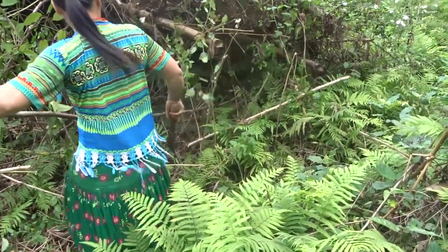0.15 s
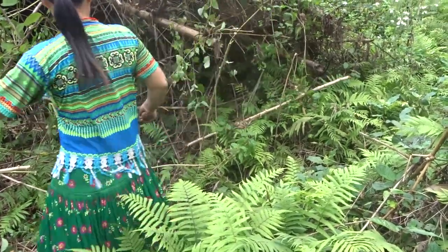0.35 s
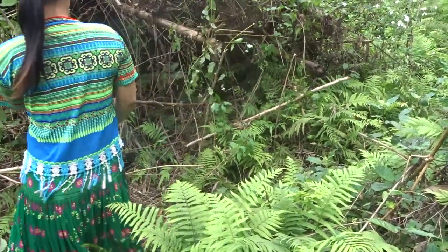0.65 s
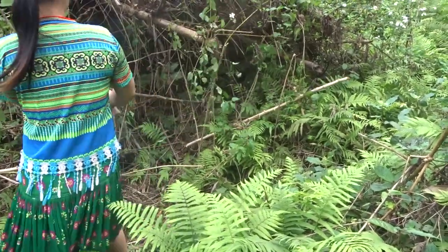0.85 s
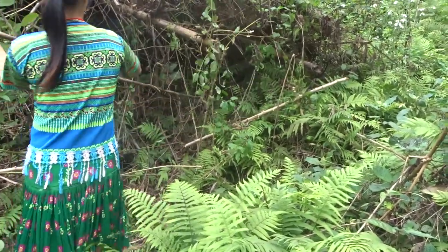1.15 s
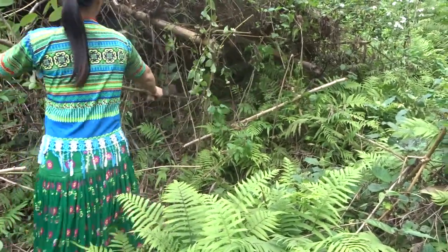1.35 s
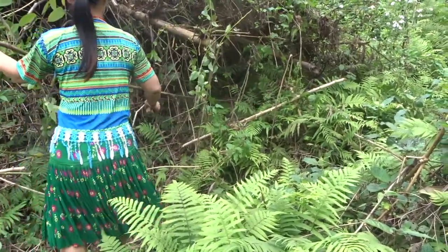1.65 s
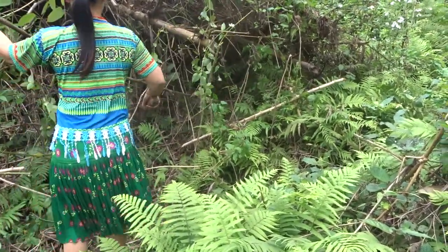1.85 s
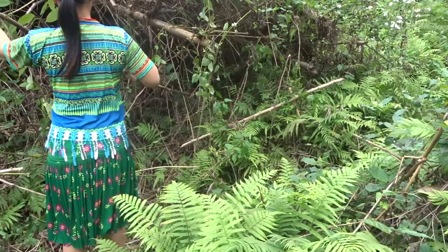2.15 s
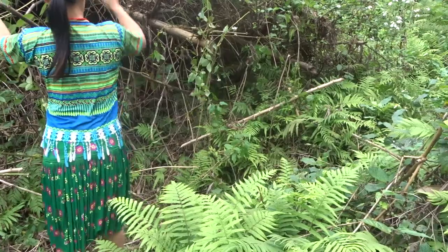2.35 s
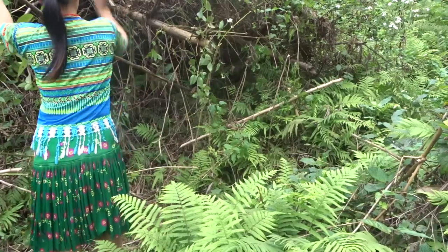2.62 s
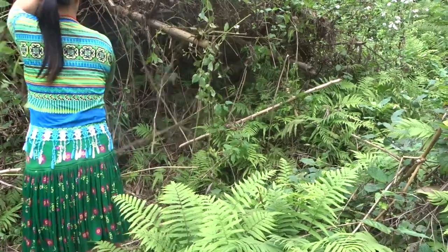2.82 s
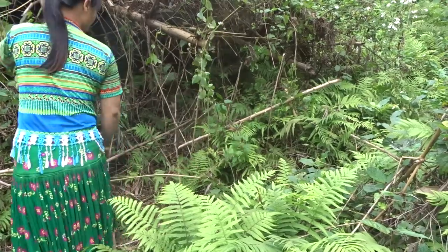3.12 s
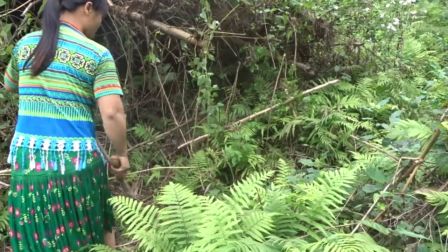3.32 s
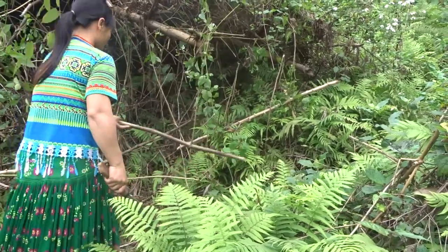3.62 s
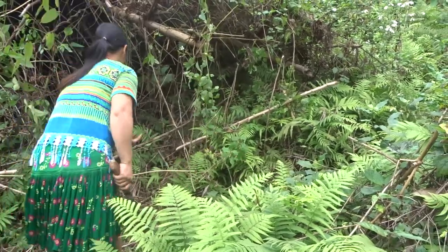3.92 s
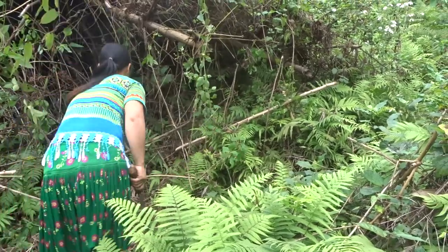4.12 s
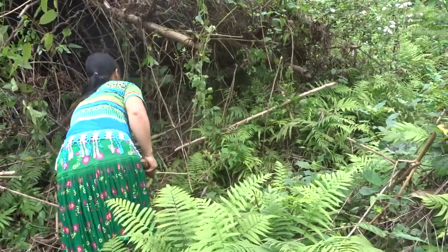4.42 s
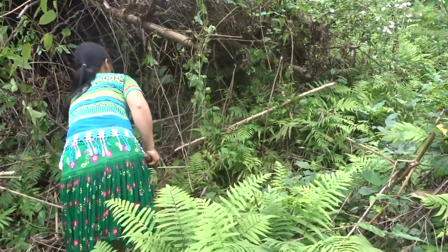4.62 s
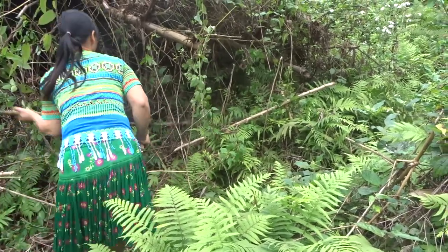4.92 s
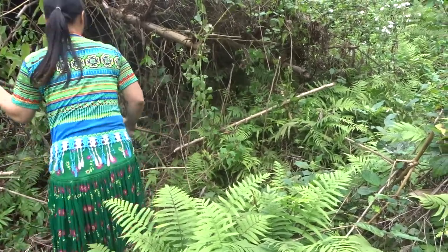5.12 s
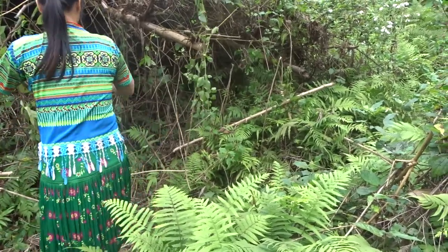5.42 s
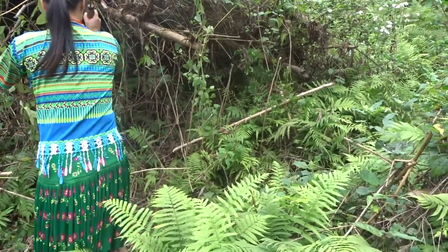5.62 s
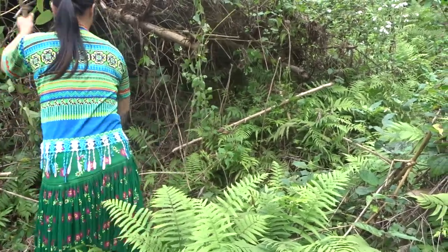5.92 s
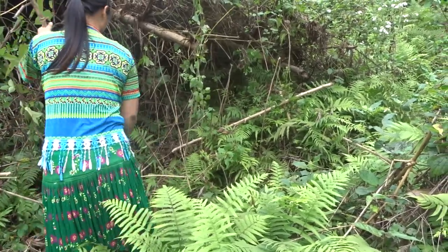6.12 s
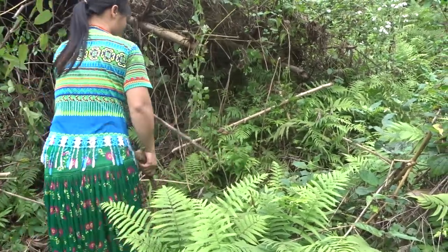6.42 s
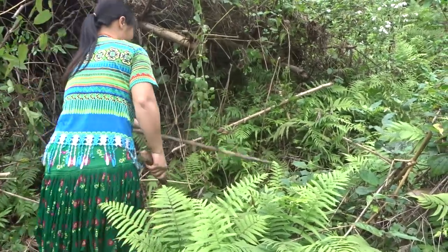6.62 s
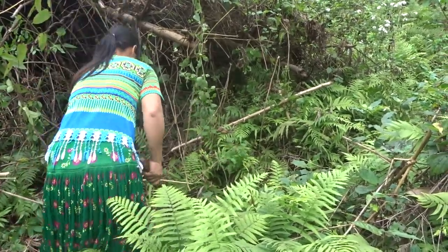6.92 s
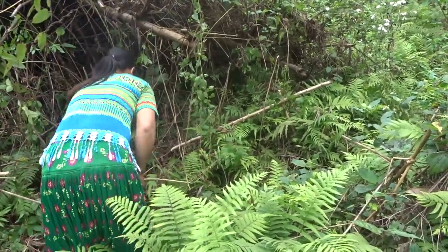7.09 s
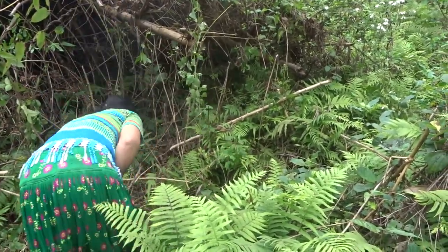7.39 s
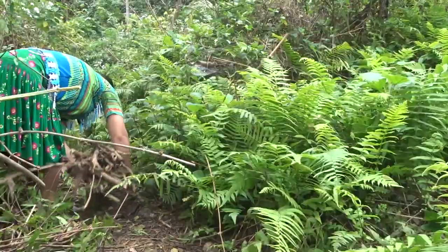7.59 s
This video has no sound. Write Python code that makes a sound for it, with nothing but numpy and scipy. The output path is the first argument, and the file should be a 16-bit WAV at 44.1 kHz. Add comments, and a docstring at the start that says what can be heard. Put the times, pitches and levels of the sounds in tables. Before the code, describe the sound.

Someone pulls dry branches from brush and snaps them: splintering breaks, crisp twig clicks, short woody knocks and rustling leaves, in irregular bursts separated by near quiet. The loudest come at the start, after one second, before three and before six. The middle has softer knocks and scraping bark. Heard outdoors from a few metres in stereo, with light scatter from trees, barely audible whistles and soft mechanical ticking.

```python
"""Dry sticks, pulled from a brush pile and snapped by hand, break a few metres from a camera in a forest.
Each break is a run of tearing fibres that excites the stick's modes and scatters diffusely among the trunks.
Twigs snap short and bright, sticks knock, bark scrapes by stick-slip, and one hard piece pings.
Each tug drives filtered noise and grains, the rustle of leaves and litter, which decays until they settle.
Under it lie gliding sine tones, thin far whistles, and filtered pulse trains, spells of faint, even ticking."""
import sys
import numpy as np
from scipy import signal
from scipy.fft import rfft, irfft, next_fast_len
from scipy.io import wavfile
from scipy.ndimage import uniform_filter1d, minimum_filter1d, map_coordinates

SR = 44100
rng = np.random.default_rng(int(sys.argv[2]) if len(sys.argv) > 2 else 0)


def write(x):
    x = np.atleast_2d(x).T
    wavfile.write(sys.argv[1], SR, np.round(np.clip(x, -1, 1) * 32767).astype(np.int16))


N = 341775
TIME = np.arange(N) / SR  # seconds

# Spells of ticking. Each row: start in seconds, end in seconds, level in dB.
TICKING_SPELLS = [(0, 1.85, -67), (3.48, 6.12, -75), (7.4, 7.65, -72)]
# Faint far whistles, probably birds. Each row: start in seconds, end in seconds, first mean pitch in Hz,
# last mean pitch in Hz, level in dB.
WHISTLE_GLIDES = [(0.54, 0.963, 1315, 1355, -69.5), (1.05, 1.27, 1370, 1330, -77.5),
                  (1.698, 1.83, 1525, 1710, -68.5), (3.373, 3.47, 3680, 3630, -77),
                  (3.801, 4.695, 7300, 6300, -69)]
# Tugs at the pile. Each row: start in seconds, leaf level in dB, litter level in dB, settling t60 in seconds.
TUGS = [(-0.03, -28.5, -49.5, 0.82), (0.2, -43, -61, 3.37), (1.16, -54.5, -67.5, 2.3),
        (1.33, -48.5, -64, 3.8), (1.8, -56.5, -72, 1.4), (2.87, -37, -47, 0.7), (3.1, -54.5, -78, 3.5),
        (3.45, -59.5, -82, 2.4), (4.05, -55.5, -60, 1.8), (4.42, -59.5, -76.5, 3.5),
        (4.971, -52, -69, 1.86), (5.37, -53, -70.5, 1.04), (5.96, -41.5, -64, 0.75),
        (6.42, -59.5, -89, 1.2), (6.88, -50, -57.5, 1.12), (7.24, -84, -65, 0.51), (7.518, -58, -93, 5.3)]
# Spectrum of rustling leaves. Each row: frequency in Hz, relative density in dB per Hz.
LEAF_SPECTRUM = [(530, -38.5), (900, -16.5), (1500, -9.5), (2850, -8), (4000, -6), (4900, -7), (6300, -4),
                 (7900, 0), (9500, -1.5), (11300, -6.5), (15800, -8.5)]
# Spectrum of shifting ground litter. Each row: frequency in Hz, relative density in dB per Hz.
LITTER_SPECTRUM = [(20, -27), (60, -17), (130, -11.5), (280, -3), (600, 0), (1100, -8.5), (2500, -44),
                   (6000, -64)]
# A branch dragged through the pile. Each row: start in seconds, end in seconds, level before colouring in dB.
SCRAPE_STROKES = [(4.719, 4.784, -50.5), (4.785, 4.828, -50), (5, 5.044, -48), (5.059, 5.123, -51),
                  (5.42, 5.492, -82)]
# Modes of one hard piece. Each row: frequency in Hz, relative level in dB, t60 in seconds.
PING_MODES = [(2216, -12.5, 0.061), (3960, -3, 0.35), (5020, -6, 0.17), (7430, -4, 0.2), (10050, -5, 0.15)]
# Sticks that give way. Each row: start in seconds, level in dB, wood tilt in dB, splinter tilt in dB,
# stick pitch in Hz, time constant of tearing in seconds.
STICK_BREAKS = [(0.003, -27.5, -12.5, 0.5, 3600, 0.026), (0.016, -28.5, 5.5, 1.5, 3560, 0.016),
                (0.151, -22, -1.5, 4, 1340, 0.0035), (0.309, -36, 4, -9.5, 1690, 0.012),
                (0.351, -33.5, -5.5, -9.5, 3960, 0.015), (1.2744, -18, 3.5, -6, 3960, 0.025),
                (1.656, -46, -2, -17.5, 3830, 0.014), (2.7698, -22.5, -3.5, -3, 2020, 0.022),
                (2.798, -31.5, -2.5, -6.5, 2590, 0.024), (2.8363, -30, 0, -8.5, 4200, 0.032),
                (2.895, -33, 13, -14, 2030, 0.018), (4.005, -27, 3.5, -17, 1820, 0.015),
                (4.055, -30.5, -0.5, -10, 2670, 0.014), (5.076, -43.5, -10, -2.5, 1940, 0.022),
                (5.9004, -19, -3.5, -6, 2480, 0.0061), (5.915, -24, -8, -3, 8710, 0.043),
                (6.078, -34, 2, -4, 3800, 0.015), (6.868, -34.5, -7, -22, 2600, 0.013),
                (6.884, -34, 4, -15, 2400, 0.0031), (6.941, -36, -2, -19, 2080, 0.006),
                (6.9732, -27, -5.5, -15, 2700, 0.0049), (7.063, -40.5, 0.5, -4, 2200, 0.0075)]
# Thin twigs that snap at once. Each row: start in seconds, level in dB, wood tilt in dB, splinter tilt in dB,
# twig pitch in Hz.
TWIG_SNAPS = [(0.055, -24, 0.5, 3.5, 8100), (0.114, -30, -6, -6, 8400), (0.8932, -27.5, -5, -10.5, 6460),
              (1.022, -51.5, 4, -19.5, 4000), (1.936, -40, -18, -5, 5850), (2.001, -41, -15, -6, 5950),
              (2.0932, -36.5, -6.5, -10, 2200), (2.178, -50.5, -11, 4, 3850),
              (2.3418, -29.5, -8.5, 3, 1380), (2.462, -50.5, -8, -15, 5800), (2.487, -49.5, -0.5, 5, 8150),
              (2.875, -24.5, -5.5, -4, 7420), (2.996, -36, -7.5, -4.5, 5600), (3.063, -38, -12, -11, 5600),
              (3.12, -44, -9, -3.5, 7800), (3.723, -45, -6.5, 6.5, 7860), (4.4, -32.5, -23.5, 5.5, 7660),
              (4.4623, -44, -28, -1.5, 9200), (4.9522, -50.5, -16, -21.5, 3000),
              (5.207, -47, -22, -1, 1670), (7.479, -52, -8, 1, 7860)]
# Wood striking wood. Each row: start in seconds, level in dB, low knock tilt in dB, stick pitch in Hz.
WOOD_KNOCKS = [(0.0653, -25.5, -2.5, 1315), (0.2, -41, 4, 940), (0.252, -44, 3, 1260),
               (0.3333, -31.5, 9, 3400), (1.31, -29.5, -9, 1720), (1.489, -51.5, 1, 1370),
               (4.038, -34, 4, 2550), (4.2744, -40, -2, 2270), (4.815, -41, -4, 1900),
               (4.827, -34, -4, 1666), (4.847, -46, 8.5, 1000), (5.097, -38, -1, 1970),
               (5.159, -45, -15, 1660), (5.1672, -45.5, -30, 1800), (5.3523, -37.5, -43, 3510),
               (5.458, -49, -10, 1950), (5.755, -59.5, -14, 2630), (6.102, -53, 4, 1730),
               (6.178, -49, 6.5, 2900), (6.4535, -55.5, -10, 3670), (7.3164, -53.5, 12.5, 2460),
               (7.696, -57, -38, 2010)]
# Spectrum common to all fractures and knocks. Each row: frequency in Hz, relative density in dB per Hz.
CRACK_SPECTRUM = [(30, -22), (100, -17.5), (180, -6), (300, 4), (600, -2.5), (1100, -8), (1800, -1),
                  (3000, -2.5), (4700, -5), (6200, -2), (8200, 4.5), (11000, -3.5), (15800, -6)]
# Decay of the echo among the trunks. Each row: frequency in Hz, t60 in seconds.
FOREST_DECAY = [(100, 0.92), (400, 0.36), (2000, 0.86), (8000, 0.4), (16000, 0.16)]
# Stereo spread. Each row: frequency in Hz, gain of the side signal in dB.
SIDE_GAIN = [(100, -6), (700, 3), (1400, -1), (2800, -2.5), (5800, -14), (8800, -11), (13500, -11)]
# The level dips briefly. Each row: time in seconds, gain in dB.
LEVEL_DIP = [(7.59, 0.5), (7.612, -12.5), (7.62, -33), (7.63, -34), (7.645, -11.5), (7.695, -2)]

TICKS_PER_S, TICK_FADE_S = 25, 0.06
TICK_WHIRR_DB = -4.5  # steady whirr between the ticks, against them
REST_LEAVES_DB, REST_LITTER_DB = -66.5, -72.5  # the undergrowth between tugs
TUG_RISE_S = 0.041
# tiny dry twigs that give way among the moving leaves: level against the leaves, rate, spread of sizes
CRACKLE_DB, CRACKLE_PER_S, CRACKLE_SPREAD_DB = -9.5, 30, 4
# tilts of the crack spectrum, in dB
BREAK_KNOCK_DB, TWIG_KNOCK_DB = -16.5, -21.5
KNOCK_WOOD_DB, KNOCK_SPLINTER_DB = 6.5, -9.5
TWIG_TEAR_S, KNOCK_CONTACT_S = 0.0024, 0.003  # time constants
BREAK_RING, TWIG_RING, KNOCK_RING = 1.68, 1.56, 2.27  # excitation of the modes, before blurring by the tear
BREAK_FIRST, TWIG_FIRST, KNOCK_FIRST = 1.9, 2.6, 4.1  # first fracture or contact, against a typical fibre
TOP_HZ = 15950  # the camera's band limit


def amp(db):
    """Decibel law: the amplitude ratio of a level."""
    return 10 ** (np.asarray(db) / 20)


def unit(x):
    """Normalisation to an rms of 1."""
    return x / np.sqrt(np.mean(x ** 2) + 1e-20)


def along(points, hz):
    """Interpolation of (Hz, value) points on a logarithmic frequency axis."""
    f, v = np.transpose(points)
    return np.interp(np.log(hz + 1), np.log(f + 1), v)


def curves(rows):
    """Linear interpolation in time: one curve for each column after the time."""
    s, *columns = np.transpose(rows)
    return [np.interp(TIME, s, column) for column in columns]


def wobble(rate):
    """Band-limited fluctuation: a spline through random knots, rate of them a second."""
    knots = rng.standard_normal(int(N * rate / SR) + 4)
    return map_coordinates(knots, [TIME * rate])


def add(track, s, sound):
    """Superposition: a sound is added to the track from s seconds on."""
    i = max(round(s * SR), 0)
    track[i:i + len(sound)] += sound[:N - i]


def coloured(x, gain_db):
    """Minimum-phase filtering: a folded cepstrum makes the gain in dB over frequency causal."""
    n = x.shape[-1]
    m = 2 * next_fast_len(n // 2 + SR // 20)
    gain = amp(gain_db(np.fft.rfftfreq(m, 1 / SR)))
    cepstrum = irfft(np.log(gain + 1e-6))
    cepstrum[1:m // 2] *= 2
    cepstrum[m // 2 + 1:] = 0
    response = np.exp(rfft(cepstrum))
    return irfft(rfft(x, m) * response, m)[..., :n]


def grains(rate, spread_db, size):
    """Random point process: impulses, rate a second on average, a few much larger than the rest."""
    happens = rng.random(size) < rate / SR
    sign = rng.choice([-1, 1], size)
    return happens * sign * amp(spread_db * np.minimum(rng.standard_normal(size), 2))


def stereo(mid, side):
    """Mid-side synthesis of left and right, with a spread that depends on frequency."""
    m = next_fast_len(N)
    spread = amp(along(SIDE_GAIN, np.fft.rfftfreq(m, 1 / SR)))
    side = irfft(rfft(side, m) * spread, m)[:N]
    return np.array([mid + side, mid - side])


def ticking():
    """Resonant filtering of a periodic pulse train: soft, even ticking nearby, perhaps the lens motor."""
    period = SR // TICKS_PER_S
    ticks = (np.arange(N) % period == 0) * amp(2.3 * wobble(12))
    source = unit(ticks) + amp(TICK_WHIRR_DB) * rng.standard_normal(N)
    housing = [(100, -37), (300, -10.5), (450, 6), (620, 0.5), (850, -9.5), (2000, -42.5)]  # (Hz, dB)
    running = np.zeros(N)
    for start, end, db in TICKING_SPELLS:
        inside = np.minimum(TIME - start, end - TIME)
        running += amp(db) * np.clip(.5 + inside / TICK_FADE_S, 0, 1)
    return running * unit(coloured(source, lambda hz: along(housing, hz)))


def whistle():
    """Frequency and amplitude modulation of sine tones that swell and fade, wavering through the foliage."""
    track = np.zeros(N)
    waver = 1 + 0.0068 * wobble(77)
    flutter = amp(4 * wobble(34))
    for start, end, first_hz, last_hz, db in WHISTLE_GLIDES:
        progress = np.clip((TIME - start) / (end - start), 0, 1)
        pitch_hz = waver * (first_hz + (last_hz - first_hz) * progress)
        phase = 2 * np.pi * np.cumsum(pitch_hz) / SR
        swell = 2 * np.sqrt(2 * progress * (1 - progress))
        track += amp(db) * swell * np.sin(phase)
    return track * flutter


def rustle(spectrum, rate, grain_share, spread_db):
    """Shot noise: many small leaf impacts crackle on a soft hiss, in stereo with an rms of 1."""
    t = np.arange(SR // 50) / SR
    flicks = grains(rate, spread_db, size=N)
    impact = np.exp(-t / 0.0066) * rng.standard_normal((2, len(t)))
    crackle = signal.fftconvolve(flicks[None], impact, axes=1)[:, :N]
    mix = rng.standard_normal((2, N)) + grain_share * unit(crackle)
    return unit(stereo(*coloured(mix, lambda hz: along(spectrum, hz))))


def brush():
    """Power addition of decaying motions: tugs set leaves swishing and litter shifting until they rest."""
    leaves_power, litter_power = amp(REST_LEAVES_DB) ** 2, amp(REST_LITTER_DB) ** 2
    for s, leaves_db, litter_db, t60 in TUGS:
        rise = np.clip((TIME - s) / TUG_RISE_S, 0, 1)
        motion = rise * amp(-60 * np.maximum(TIME - s - TUG_RISE_S, 0) / t60)
        leaves_power = leaves_power + (amp(leaves_db) * motion) ** 2
        litter_power = litter_power + (amp(litter_db) * motion) ** 2
    leaves_level, litter_level = np.sqrt(leaves_power), np.sqrt(litter_power)
    leaves = leaves_level * amp(0.32 * wobble(25))
    leaves = leaves * rustle(LEAF_SPECTRUM, rate=260, grain_share=0.7, spread_db=6.0)
    litter = litter_level * amp(0.5 * wobble(9.9))
    litter = litter * rustle(LITTER_SPECTRUM, rate=90, grain_share=0.43, spread_db=2.0)
    twigs = rustle(LEAF_SPECTRUM, rate=CRACKLE_PER_S, grain_share=6, spread_db=CRACKLE_SPREAD_DB)
    return leaves + leaves_level * amp(CRACKLE_DB) * twigs + litter


def scrapes(pitch_hz=1650, scatter=0.324, count=30):
    """Stick-slip friction: bark catches and slips; every slip knocks a different twig and grates a little."""
    track, t = np.zeros(N), np.arange(SR // 40) / SR
    for start, end, db in SCRAPE_STROKES:
        stroke = np.zeros(N)
        for k, (late, size, detune) in enumerate(rng.standard_normal((count, 3))):
            knock = np.sin(2 * np.pi * pitch_hz * np.exp(scatter * detune) * t)
            grating = .7 * rng.standard_normal(len(t))
            slip = (knock + grating) * np.exp(-t / .0025)
            s = start + (end - start) * (k + late / 2) / count
            add(stroke, s, amp(2.4 * size) * slip)
        # rms 1 over the stroke's duration
        track += amp(db) * stroke * np.sqrt(abs(end - start) * SR / np.sum(stroke ** 2))
    colour = [(60, -22), (300, -5.0), (800, -5.0), (1700, 0.5), (3800, 1.5), (6000, 1.5), (15000, -4.0)]
    return coloured(track, lambda hz: along(colour, hz))


def ping(s=2.0945, db=-39):
    """Modal synthesis: a struck hard piece rings on as a sum of exponentially decaying sines."""
    track, t = np.zeros(N), np.arange(SR // 2) / SR
    ringing = sum(amp(level - 60 * t / t60) * np.sin(2 * np.pi * hz * t) for hz, level, t60 in PING_MODES)
    add(track, s, amp(db) * ringing)
    return track


def stick_modes(hz, pitch_hz, width=0.054, count=8):
    """Resonance: a stick's main mode and weaker ones that differ from stick to stick, as a gain shape."""
    others = np.geomspace(800, 6000, count) * np.exp(.12 * rng.standard_normal(count))

    def bump(centre):
        return 1 / (1 + ((hz - centre) / (width * centre + 30)) ** 2)

    minor = np.max([bump(centre) for centre in others], axis=0)
    return np.maximum(9 * bump(pitch_hz), 6 * minor)


def snap(knock_db, wood_db, splinter_db, pitch_hz, tear, ring, first):
    """Brittle fracture: a first crack, then ever weaker fibres; rms 1 over the first 10 ms."""
    t = np.arange(SR // 4) / SR
    fibres = grains(2600, 4.3, size=len(t)) * np.exp(-t / max(tear, 5e-4))
    fibres[0] = first
    # each fracture is a sharp spike, followed by its scatter off the nearby twigs and ground; powers add
    answer = np.exp(-t / 0.00021) + amp(-31.5) * np.exp(-t / 0.006)
    power = np.abs(signal.fftconvolve(fibres ** 2, answer)[:len(t)])
    onset = 1 - np.exp(-t / 0.00046)  # soft onset: each snap swells in over about a millisecond
    burst = onset * np.sqrt(power) * rng.standard_normal(len(t))
    tilt = [(400, knock_db), (950, (knock_db + wood_db) / 2 + 4), (1800, wood_db - 2.0),
            (4500, 0.007), (8500, 0), (12500, splinter_db + 7.5)]  # (Hz, dB)
    # a clean knock rings the stick; a long tear keeps changing its length and blurs the modes
    ringing = ring / (1 + abs(tear) / 0.04)

    def colour(hz):
        return along(CRACK_SPECTRUM, hz) + along(tilt, hz) + ringing * stick_modes(hz, pitch_hz)

    sound = coloured(burst, colour)
    return sound / np.sqrt(np.mean(sound[:SR // 100] ** 2))


def sticks():
    """Impulsive excitation of wood: breaks tear on, twigs snap short and bright, knocks are short and woody."""
    track = np.zeros(N)
    for s, db, wood_db, splinter_db, pitch_hz, tear in STICK_BREAKS:
        crack = snap(BREAK_KNOCK_DB, wood_db, splinter_db, pitch_hz, tear, BREAK_RING, BREAK_FIRST)
        add(track, s, amp(db) * crack)
    for s, db, wood_db, splinter_db, pitch_hz in TWIG_SNAPS:
        crack = snap(TWIG_KNOCK_DB, wood_db, splinter_db, pitch_hz, TWIG_TEAR_S, TWIG_RING, TWIG_FIRST)
        add(track, s, amp(db) * crack)
    for s, db, knock_db, pitch_hz in WOOD_KNOCKS:
        knock = snap(knock_db, KNOCK_WOOD_DB, KNOCK_SPLINTER_DB, pitch_hz,
                     KNOCK_CONTACT_S, KNOCK_RING, KNOCK_FIRST)
        add(track, s, amp(db) * knock)
    return track


def forest(x):
    """Diffuse scattering from trunks and foliage: the power in each band lingers and fades as noise."""
    hz, t, z = signal.stft(x, SR, nperseg=256)
    lag = t[t < 1]
    # -120 in amp() is -60 dB of power at t60; the echo builds up over some milliseconds
    decay = amp(-120 * lag / along(FOREST_DECAY, hz)[:, None]) * (1 - np.exp(-lag / 0.004)) ** 2
    decay = decay / decay.sum(axis=1, keepdims=True)
    power = uniform_filter1d(np.abs(z) ** 2, size=5, axis=0)
    power = signal.fftconvolve(power, decay, axes=1)[:, :len(t)]
    hiss = signal.stft(rng.standard_normal(N), nperseg=256)[2]
    tone = [(80, -26), (300, 8.0), (1200, -1.5), (4000, -3), (8000, -4.0), (14000, -2)]  # (Hz, dB)
    colour = amp(along(tone, hz))[:, None]
    echo = hiss / hiss.std() * np.sqrt(np.abs(power)) * colour
    return signal.istft(echo, nperseg=256)[1][:N]


def sideways(x):
    """Spatial difference between two microphone ports: a phase shift and early reflections from either side."""
    t = np.arange(SR // 20) / SR
    reflections = np.exp(-t / 0.0042) * rng.standard_normal(len(t))
    reflections = reflections / np.linalg.norm(reflections)
    quadrature = signal.hilbert(x, next_fast_len(N))[:N].imag  # a quarter cycle shifted
    return amp(-7.0) * quadrature + amp(-13.5) * signal.fftconvolve(x, reflections)[:N]


def scene():
    """Superposition of direct wood sound, its forest echo and the background, with a slight left bias."""
    wood = sticks() + ping() + scrapes()
    mid = wood + amp(-12) * forest(wood)
    side = amp(-0.5) * sideways(wood) + amp(-16.5) * forest(wood)
    heard = stereo(mid, side) + brush() + whistle() + ticking()
    balance = amp([[.25], [-.25]])
    return heard * amp(curves(LEVEL_DIP)[0]) * balance


def record(dry, ceiling_db=-20):
    """Limiting and band limiting: the camera holds down the loudest cracks and drops the top treble."""
    level = np.sqrt(np.abs(uniform_filter1d(np.mean(dry ** 2, axis=0), size=90)))
    needed = np.minimum(1, amp(ceiling_db) / (level + 1e-9))
    gain = uniform_filter1d(minimum_filter1d(needed, size=60), size=60)
    m = next_fast_len(N + SR // 2)
    passed = np.fft.rfftfreq(m, 1 / SR) < TOP_HZ
    return irfft(rfft(dry * gain, m) * passed, m)[:, :N]


dry = scene()
out = record(dry)
write(out)
```